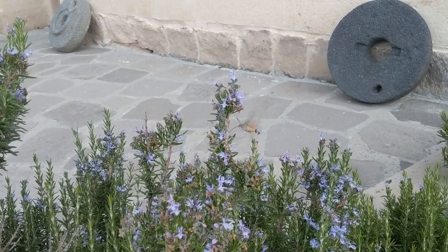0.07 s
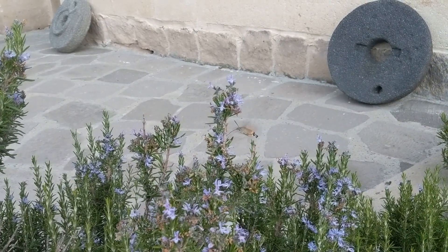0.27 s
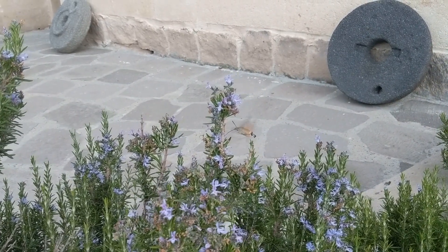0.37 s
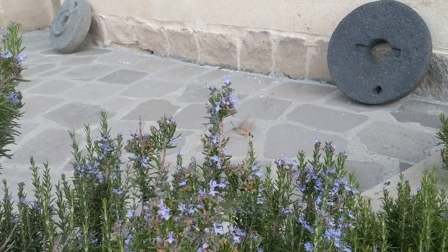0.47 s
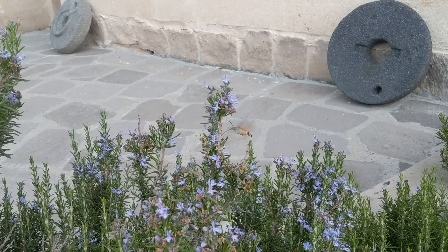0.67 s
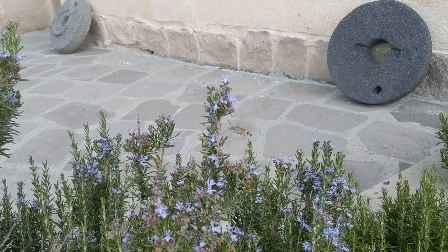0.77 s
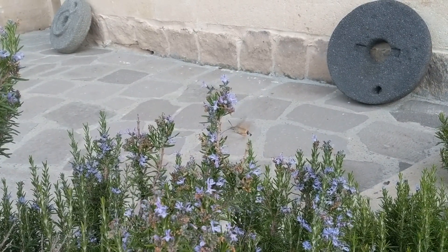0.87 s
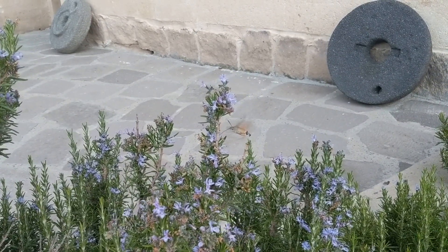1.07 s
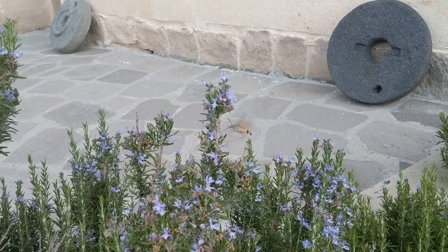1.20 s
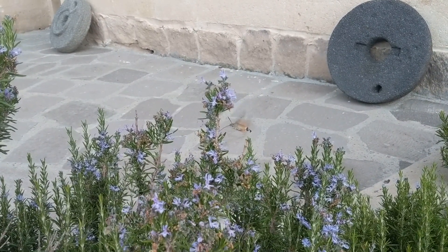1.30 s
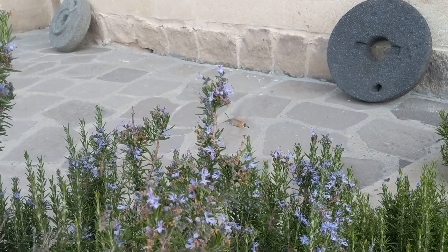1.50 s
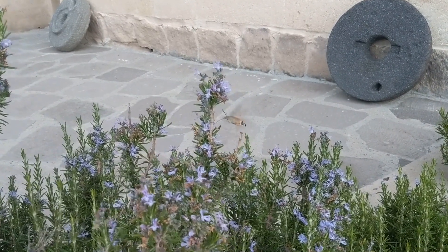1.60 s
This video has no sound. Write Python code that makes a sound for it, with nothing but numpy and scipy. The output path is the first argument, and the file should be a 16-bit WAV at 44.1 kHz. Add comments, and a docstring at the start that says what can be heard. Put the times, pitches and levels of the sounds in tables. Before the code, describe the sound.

A small bird chirps close by, a distant bird replies faintly, then the first chirps again. The garden yard's walls and paving add a brief echo, with a quiet low rumble and a few tiny rustles behind.

```python
"""A paved, walled garden yard: a small sparrow-like bird chirps twice, and a fainter chirp answers from
far off. The two sides of the syrinx sound together: a high voice falls and arches, while a low one rises
and settles on a clear whistle. Paving and walls return the chirps as echoes and reverberation.
Behind them lie a soft outdoor rumble with a faint low tone in it, and a few tiny rustles."""
import sys
import numpy as np
from scipy import signal
from scipy.fft import rfft, irfft, next_fast_len
from scipy.io import wavfile

SR = 44100
rng = np.random.default_rng(int(sys.argv[2]) if len(sys.argv) > 2 else 0)


def generate_wav(signal):
    """Clip the signal to [-1, 1] and save it as 16-bit WAV at the path in sys.argv[1]."""
    frames = np.transpose(np.atleast_2d(signal))
    scaled = np.clip(frames, -1, 1) * 32767
    pcm = np.round(scaled).astype(np.int16)
    wavfile.write(sys.argv[1], SR, pcm)


N = 72765
TIME = np.arange(N) / SR


def from_db(db):
    """Amplitude ratio of a level in decibels."""
    return 10 ** (np.asarray(db) / 20)


def rms_one(x):
    """Normalisation to an rms of 1."""
    return x / np.sqrt(np.mean(x ** 2) + 1e-20)


def drift(rate_hz):
    """Low-pass filtered noise: a smooth random fluctuation of rms 1."""
    pole = np.exp(-2 * np.pi * rate_hz / SR)
    return rms_one(signal.lfilter([1], [1, -2 * pole, pole * pole], rng.standard_normal(2 * N))[N:])


def noise(spectrum):
    """Spectral shaping: white noise weighted by the given spectrum, at rms 1."""
    hz, db = np.transpose(spectrum)
    bins = np.maximum(np.fft.rfftfreq(N, 1 / SR), 1)
    gain = from_db(np.interp(np.log(bins), np.log(hz), db))
    return rms_one(irfft(rfft(rng.standard_normal(N)) * gain, N))


def delayed(x, s):
    """Propagation delay of s seconds: a phase lag proportional to frequency."""
    size = next_fast_len(N + SR)
    lag = np.exp(-2j * np.pi * s * np.fft.rfftfreq(size, 1 / SR))
    return irfft(rfft(x, size) * lag, size)[:N]


def scatter(x, t60_s, onset_s=.0067):
    """Diffuse reverberation: dense reflections of unit energy build up, then decay exponentially."""
    t = TIME[:SR]
    build_up = 1 - np.exp(-(t / onset_s) ** 2)
    tail = rng.standard_normal(SR) * from_db(-60 * t / t60_s) * build_up
    return signal.fftconvolve(x, tail / np.sqrt(np.sum(tail ** 2)))[:N]


# Spectrum of the rumble. Each row: frequency in Hz, relative spectral density in dB.
RUMBLE_SPECTRUM = [(20, -6.5), (40, 0), (70, -0.5), (130, 0), (250, -2), (500, -6.5), (1000, -11.5),
                   (2000, -15.5), (4000, -18.5), (8000, -21.5), (15500, -22)]
# Envelope of the rumble. Each row: time in seconds, relative level in dB.
RUMBLE_LEVELS = [(0.0, -70), (0.22, -70.5), (0.44, -68.5), (1.152, -69.5), (1.57, -68.5), (1.576, -70.5),
                 (1.65, -68)]

def rumble(gain_db=4.5):
    """Ambient noise: distant rumble and hiss, densest at low frequencies."""
    return from_db(np.interp(TIME, *np.transpose(RUMBLE_LEVELS)) + gain_db) * noise(RUMBLE_SPECTRUM)


# Swells of the low tone in the rumble. Each row: time in seconds, relative level in dB.
LOW_TONE_SWELLS = [(0.0, -81), (0.058, -70.5), (0.33, -74), (0.372, -64.5), (0.726, -80), (0.858, -70),
                   (0.882, -82), (0.922, -68), (1.65, -76)]

def low_tone(hz=156.4, wander=.0117, gain_db=-1, waver_db=.5):
    """Amplitude modulation: a faint low tone in the rumble swells and fades at set, irregular times."""
    phase = 2 * np.pi * np.cumsum(hz * (1 + wander * drift(7.5))) / SR
    db = np.interp(TIME, *np.transpose(LOW_TONE_SWELLS)) + gain_db + waver_db * drift(7)
    return from_db(db) * np.sqrt(2) * np.sin(phase)


# Spectrum of a rustle. Each row: frequency in Hz, relative spectral density in dB.
RUSTLE_SPECTRUM = [(1000, -10), (2800, 0), (4300, 5), (6200, -11), (8000, -16), (15000, -29)]
# A few tiny rustles. Each row: peak time in seconds, level in dB.
RUSTLE_PUFFS = [(0.579, -64.5), (.636, -74), (.672, -80), (1.389, -71.5)]

def rustles(width_s=.0066):
    """Noise bursts: Gaussian envelopes shape bright noise into tiny soft puffs."""
    envelope = sum(from_db(db) * np.exp(-.5 * ((TIME - s) / width_s) ** 2) for s, db in RUSTLE_PUFFS)
    return envelope * noise(RUSTLE_SPECTRUM)


def voice(rows, rasp, rasp_rate_hz=762, flutter_db=3.5):
    """Phase and envelope of one side of the syrinx; fast random modulation makes its glide rasp."""
    s, hz, db = np.transpose(rows)
    pitch = np.interp(TIME, s, hz) * (1 + rasp * drift(rasp_rate_hz))
    level = from_db(np.interp(TIME, s, db) + flutter_db * np.tanh(drift(rasp_rate_hz)))
    return 2 * np.pi * np.cumsum(pitch) / SR, level * (TIME > s[0]) * (TIME < s[-1])


# Glide of the far chirp. Each row: time in seconds, pitch in Hz, relative level in dB.
FAR_GLIDE = [(.735, 6020, -78), (.752, 5185, -64.5), (.766, 5630, -56), (.780, 5000, -77),
             (.792, 4385, -61.5), (.822, 4046, -63), (.845, 4000, -82)]

def far_bird(direct_db=-4.5, reverberant_db=-5.5):
    """A faint falling chirp: at a distance, reverberation nearly equals the direct sound."""
    phase, level = voice(FAR_GLIDE, rasp=.05)
    call = level * np.sin(phase)
    return from_db(direct_db) * call + from_db(reverberant_db) * scatter(call, t60_s=.74)


# Echoes off paving, walls and a far house front. Each row: delay in seconds, gain in dB.
YARD_ECHOES = [(.0113, -1), (.0205, -13.5), (.036, -20), (.176, -33)]

def yard(x, comb_spacing_hz=1821, paving_db=-8.5):
    """Reflection: the bounce off the paving comb-filters the direct sound; echoes and scatter follow."""
    coloured = x + from_db(paving_db) * delayed(x, 1 / comb_spacing_hz)
    echoes = sum(from_db(db) * delayed(x, s) for s, db in YARD_ECHOES)
    near_walls = from_db(-4.5) * scatter(x, t60_s=.18)
    far_walls = from_db(-22) * scatter(x, t60_s=.44, onset_s=.057)
    return coloured + echoes + near_walls + far_walls


# Spectrum of air through the beak. Each row: frequency in Hz, relative spectral density in dB.
BREATH_SPECTRUM = [(1200, -33), (2200, -8), (3200, 3.5), (5500, 2.5), (7000, -8), (9500, -1.5),
                   (12000, -16.5), (15500, -22)]

def breath(high, low, reference_db=-33, air_db=-18.5, exponent=.58):
    """Flow noise in the beak grows as a power of the voices' amplitude."""
    drive = np.hypot(high, from_db(-16.5) * low)   # the low voice stirs less air
    effort = (drive / from_db(reference_db)) ** exponent
    return from_db(reference_db + air_db) * effort * noise(BREATH_SPECTRUM)


# Glides of the two voices, one per chirp. Each row: time in seconds, pitch in Hz, relative level in dB.
HIGH_GLIDES = [
    [(.212, 7200, -65), (.228, 6430, -54.5), (.246, 5650, -40.5), (.265, 5100, -40), (.270, 5300, -29.5),
     (.2755, 5800, -35), (.281, 4700, -36), (.288, 5450, -42), (.299, 5050, -47), (.309, 4700, -60)],
    [(.990, 6786, -73), (1.006, 6160, -54), (1.022, 5500, -45), (1.033, 5400, -40.5), (1.043, 5050, -49.5),
     (1.053, 5350, -37), (1.060, 5650, -36), (1.067, 4800, -48.5), (1.080, 5400, -46.5), (1.090, 4800, -56)],
]
LOW_GLIDES = [
    [(.215, 3386, -83), (.247, 3400, -51.5), (.259, 4350, -43), (.268, 4750, -41), (.279, 4000, -36),
     (.298, 3600, -47.5), (.307, 3687, -33.5), (.319, 3738, -33), (.326, 3683, -38.5), (.331, 3000, -42.5),
     (.341, 2850, -52.5)],
    [(.998, 3500, -75), (1.028, 2950, -55), (1.040, 4450, -40.5), (1.051, 4700, -41.5),
     (1.066, 4026, -41.5), (1.084, 3550, -50), (1.098, 3653, -33), (1.108, 3808, -43.5), (1.114, 3050, -43),
     (1.126, 2850, -60)],
]
# Rasp, hoarse at first and clearing for the whistle.
# Each row: time into the chirp in seconds, rms wobble as a fraction of the pitch.
RASP_DEPTHS = [(0, .06), (.035, 0.096), (.060, .016), (.078, 0.086), (.104, .015), (.125, .045)]
# Onset of the rasp curve. Each entry: start in seconds for one chirp.
RASP_STARTS = [0.2087, .99]

def chirp(high_rows, low_rows, start, throat_band_hz=(2820, 6700)):
    """Biphonation: two voices filtered by the throat, with octaves, combination tones and breath."""
    rasp = np.interp(TIME - start, *np.transpose(RASP_DEPTHS))
    high_phase, high = voice(high_rows, rasp)
    low_phase, low = voice(low_rows, rasp)
    throat = signal.butter(4, throat_band_hz, "band", fs=SR, output="sos")
    tones = signal.sosfilt(throat, high * np.sin(high_phase) + low * np.sin(low_phase) + 1e-18)
    high_octave = from_db(-31.5) * high * np.sin(2 * high_phase)
    low_octave = from_db(-36.5) * low * np.sin(2 * low_phase)
    sum_tone = from_db(-25.5) * np.sin(high_phase + low_phase)
    difference_tone = from_db(-35) * np.sin(high_phase - low_phase)
    combination = np.sqrt(high * low) * (sum_tone + difference_tone)
    return tones + high_octave + low_octave + combination + breath(high, low)


def scene():
    """Superposition of the near bird in its yard, the far bird and the background, in one channel."""
    bird = sum(chirp(*parts) for parts in zip(HIGH_GLIDES, LOW_GLIDES, RASP_STARTS))
    return (yard(bird) + far_bird() + rustles() + rumble() + low_tone())[None]


def record(dry, cutoff_hz=15750):
    """Band limiting: an elliptic low-pass filter cuts the highest treble steeply."""
    return signal.sosfilt(signal.ellip(12, .1, 70, cutoff_hz, fs=SR, output="sos"), dry)


dry = scene()
out = record(dry)
generate_wav(out)
```